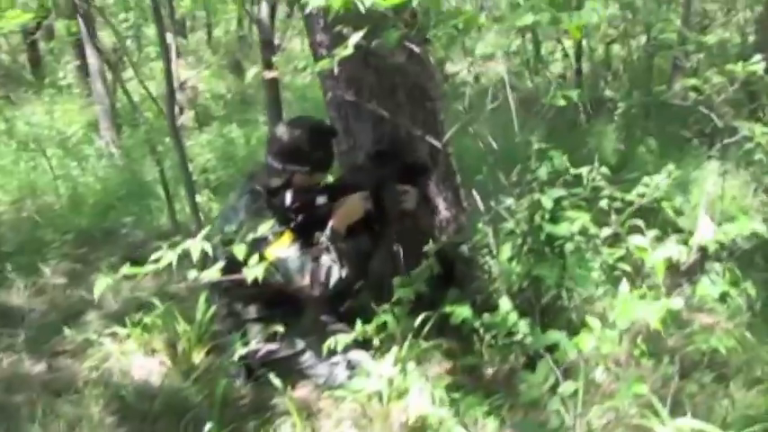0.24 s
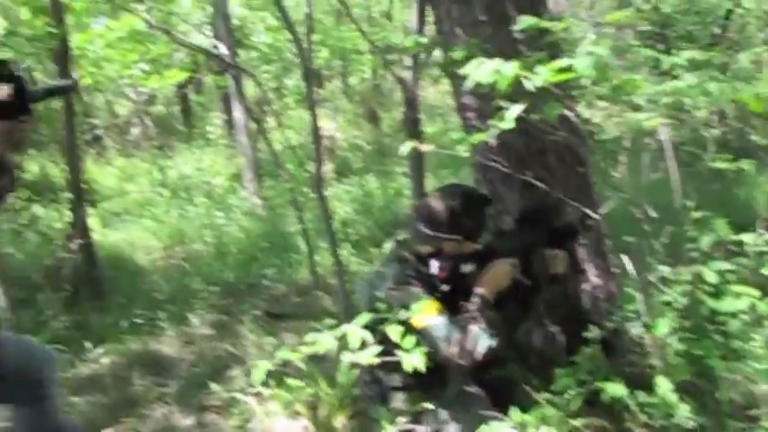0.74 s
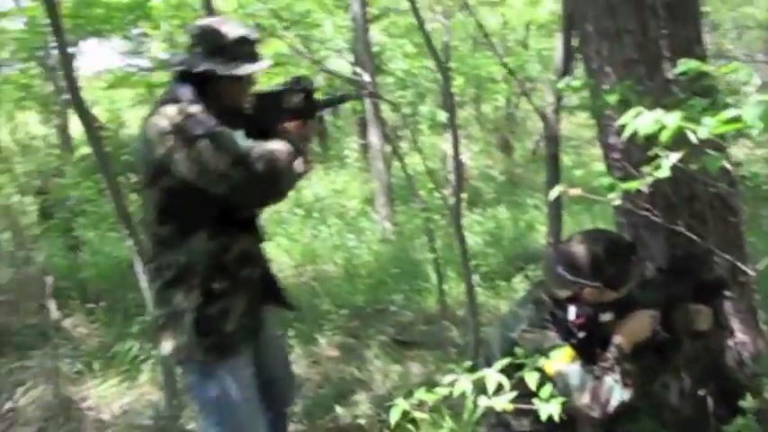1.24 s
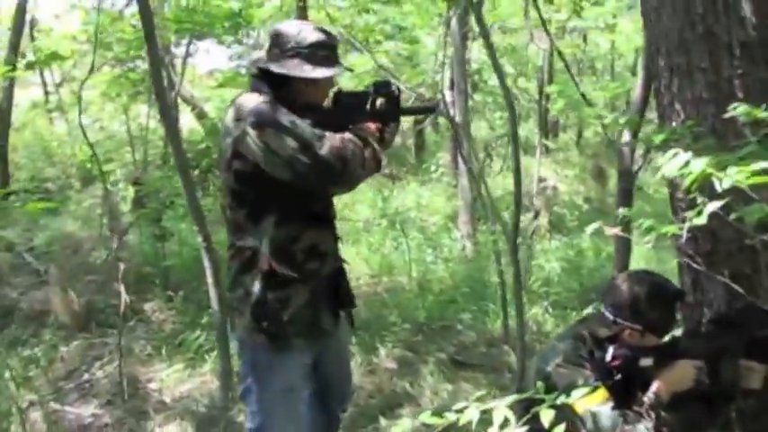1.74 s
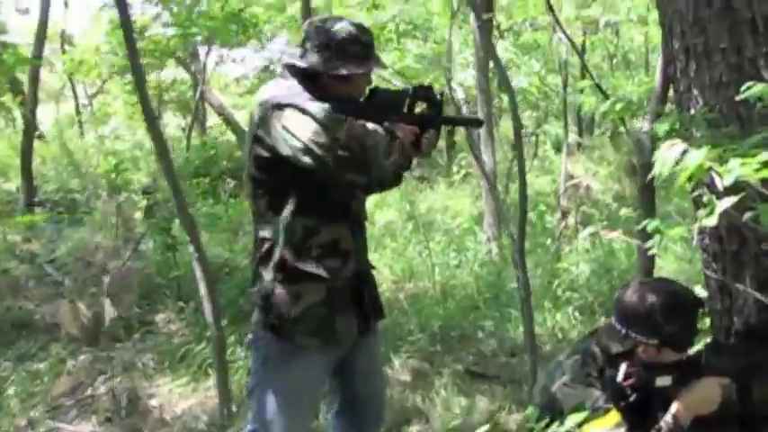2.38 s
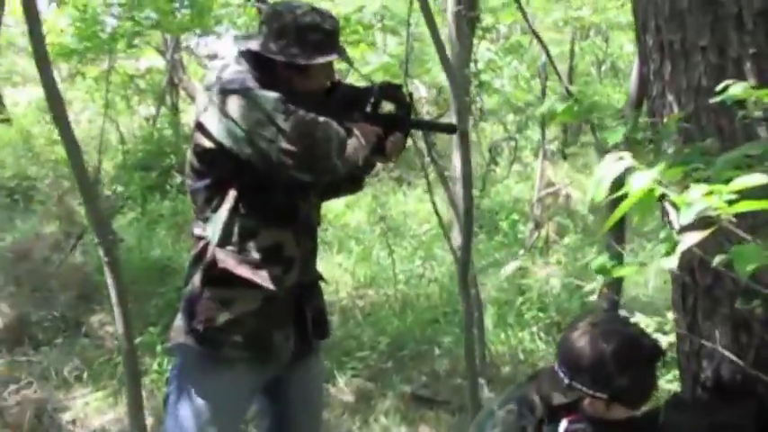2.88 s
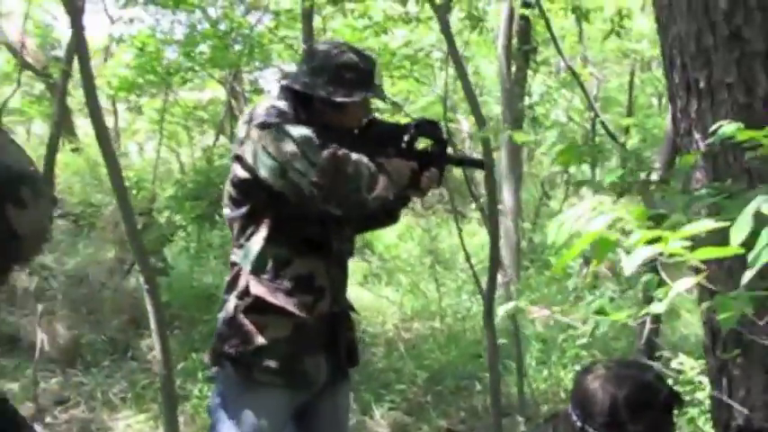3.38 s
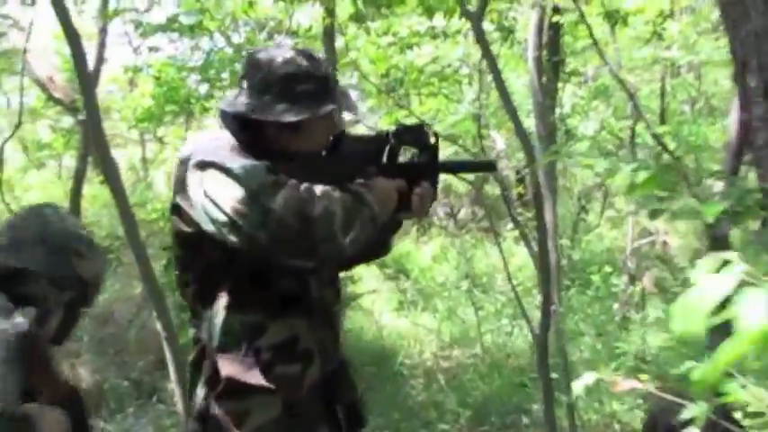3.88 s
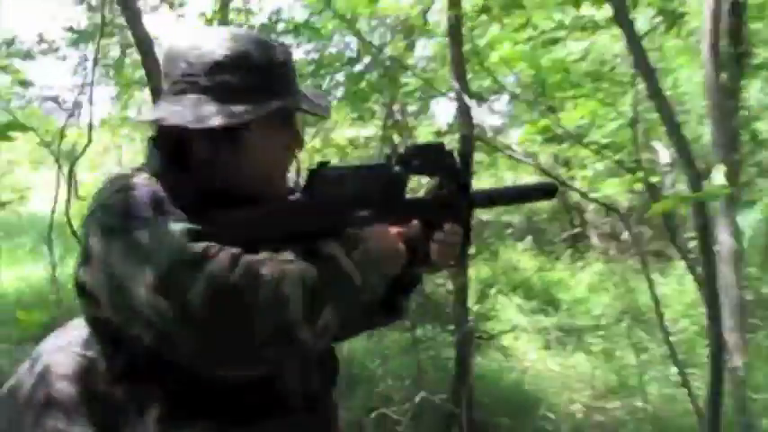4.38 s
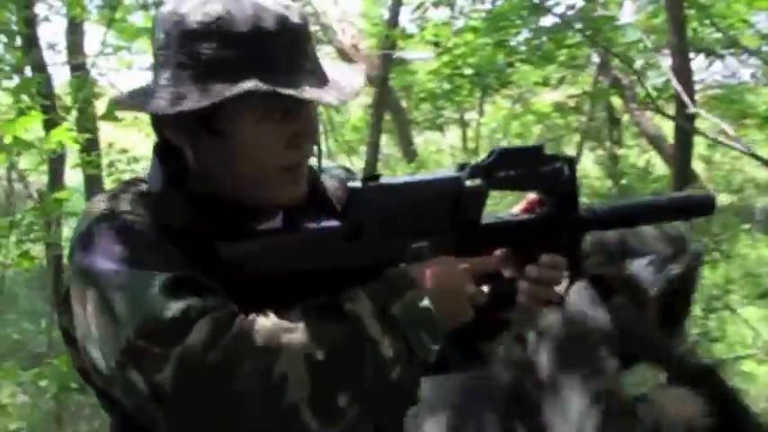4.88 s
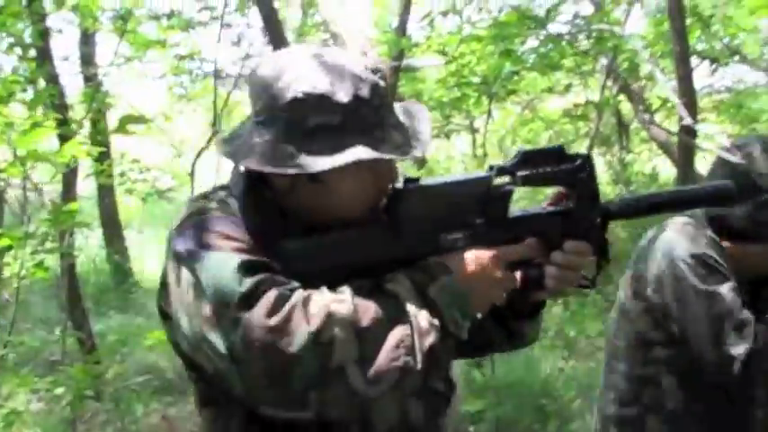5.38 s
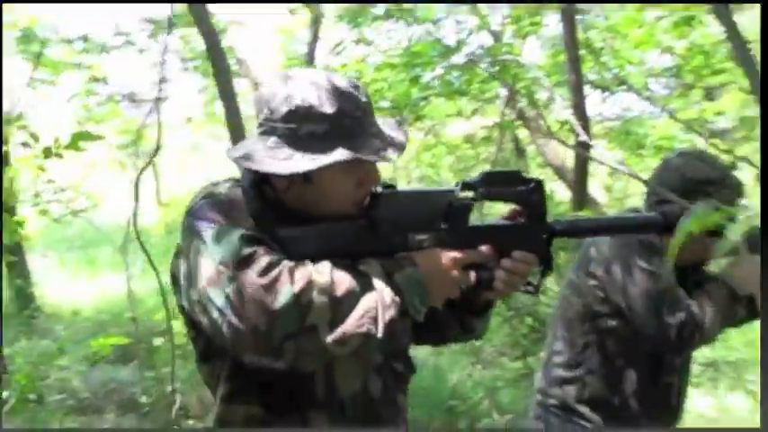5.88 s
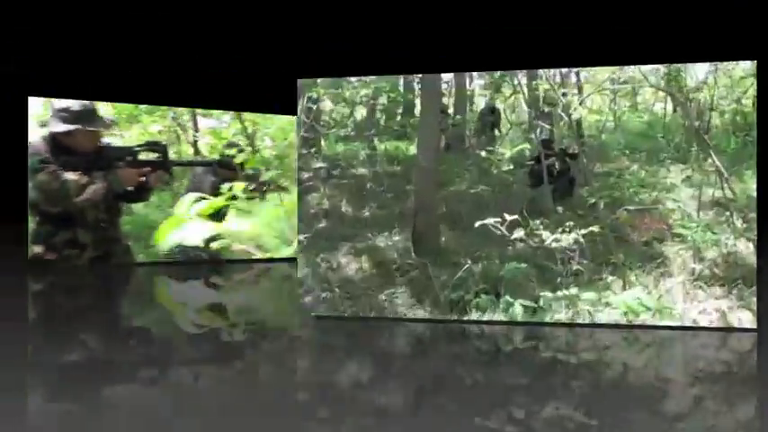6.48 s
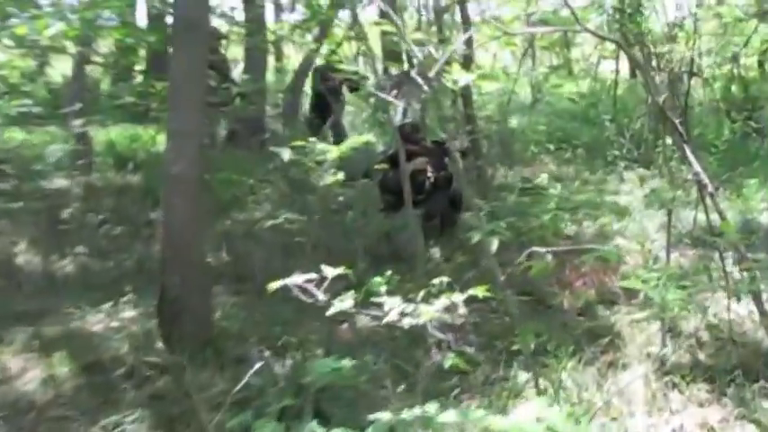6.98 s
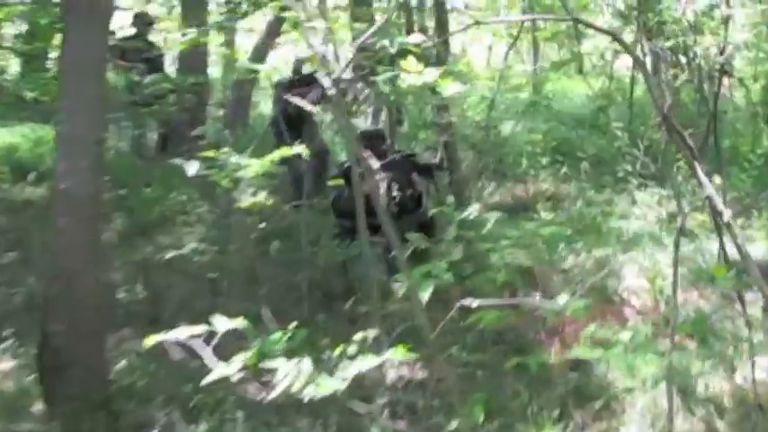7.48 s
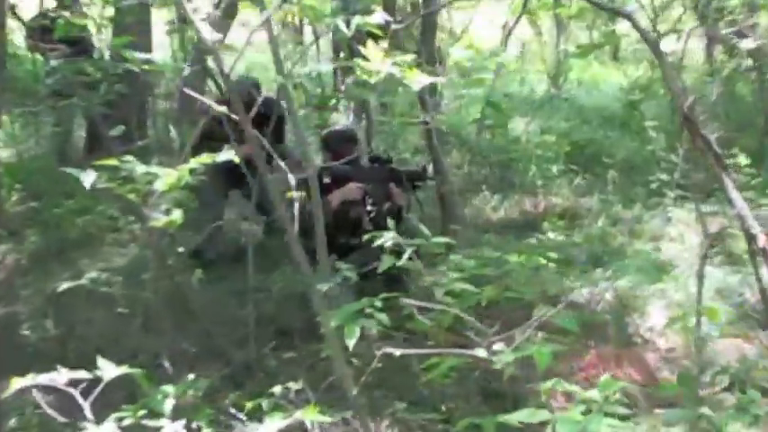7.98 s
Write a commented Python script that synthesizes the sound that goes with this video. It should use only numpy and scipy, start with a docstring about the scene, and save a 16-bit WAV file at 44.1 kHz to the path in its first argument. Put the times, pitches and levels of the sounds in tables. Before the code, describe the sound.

Outdoors in woodland, heard in stereo, electric airsoft guns fire over crisp leaf rustle and small ticks of twigs and pellets. Irregular single shots with short motor whines come first, then a steady run of clacking shots. A brief scrape and sharp snaps lead into a rapid automatic burst that trails off in fainter shots. A more distant, uneven burst follows, the cracks scattering briefly among the trees.

```python
"""Four electric airsoft guns fire in leafy woodland, heard at two microphones.
Leaves rustle and gears whirr; one gun fires single shots, and a second joins it at 2.3 s. After a scrape
and sharp snaps, a third fires a burst at 5.5 s that trails off in fainter shots; a fourth follows at 6.8 s.
In each full shot the gears wind, the piston rattles loose, air cracks at the muzzle and the piston slams.
Throughout, rough noise swells and fades, twigs and pellets tick, and trunks scatter the sharp sounds."""
import sys
import numpy as np
from scipy import signal
from scipy.fft import rfft, irfft
from scipy.io import wavfile
from scipy.ndimage import uniform_filter1d

SR = 44100
rng = np.random.default_rng(int(sys.argv[2]) if len(sys.argv) > 2 else 0)


def int16_out(signal):
    """Quantize to a 16-bit WAV file."""
    q = np.round(np.clip(np.atleast_2d(signal).T, -1, 1) * 32767)
    wavfile.write(sys.argv[1], SR, q.astype(np.int16))


N = 363384

# shots of the automatic burst: time_s, crack_peak_db, slam_db, winding_db
AUTOMATIC_SHOTS = [(5.4615, 1.5, -11, -32), (5.532, 2, -15, -43), (5.595, -2, -16, -36),
                   (5.657, -3, -18, -35), (5.719, -8, -17, -46), (5.778, -2.5, -18.5, -31),
                   (5.84, -1.5, -18, -35), (5.899, 1, -16.5, -33), (5.961, -6, -18, -31.5),
                   (6.021, 2.5, -17.5, -30), (6.081, -1.5, -18.5, -32.5), (6.141, 0, -20.5, -40),
                   (6.203, -6, -21, -38), (6.263, -1.5, -22, -32.5)]
# spectrum of meshing gears: frequency_hz, gain_db
GEAR_SPECTRUM = [(180, -18), (300, -48), (375, -12), (557, 1), (932, 0.5), (1080, 2.5), (2310, 1.5),
                 (3130, -0.5), (7000, -3), (9100, -5.5), (15400, -120)]
# direction of the surrounding activity: time_s, left_lag_samples
ARRIVAL_LAG = [(0, -1.5), (.7, -2.5), (1.1, 5.5), (3.2, 2), (3.7, 2), (4.8, 3.5), (5.2, 4), (6.2, 5.5),
               (6.8, 2.5), (8.24, -3.5)]
# likeness of diffuse sound at the two microphones: frequency_hz, coherence
COHERENCE = [(25, 0.52), (70, 0.78), (290, 1), (1400, 0.82), (4000, 0.095), (15000, 0.32)]


def gun(shots, crack_spectrum, slam_spectrum, modes, *, crack_ms, slam_ms, slam_t60, landing_db,
        rattle_db, rattle_ms, rattle_width_ms, latch_db, latch_ms, latch_hz, wind_ms, coast_t60,
        drone_hz, drone_db, drone_from_ms, drone_to_ms, rough, lag, pan_db, thump_db, thump_hz):
    """A spring-driven piston expels a pressure pulse, and its impact excites the modes of the body."""
    # Instants count from the crack; t60s are in s; rough is the drone's share of noise.
    # Landing, rattle, latch and thump levels are relative to the slam, the drone's to the winding.
    lead_s, out = .1, np.zeros((2, N))
    t = np.arange(16384) / SR - lead_s - .003
    ms = t * 1000
    after = np.maximum(t - slam_ms / 1000, 0)  # s since the piston met the cylinder head
    winding = np.clip((ms + wind_ms) / 8, 0, 1) * gain_of(-60 * np.maximum(t, 0) / coast_t60)
    droning = np.clip(np.minimum(ms - drone_from_ms, drone_to_ms - ms) / 7, 0, 1)
    # a low jolt as the piston leaps forward, 6 ms ahead of the crack
    thump = gain_of(thump_db) * np.sin(2 * np.pi * thump_hz * (ms + 6) / 1000) * gaussian(ms, -6, 6)
    loose = gain_of(rattle_db) * gaussian(ms, rattle_ms, rattle_width_ms)
    landing = gain_of(landing_db) * np.minimum(after / .00015, 1) * gaussian(after, 0, .00237)
    slamming = np.minimum(after / .00073, 1) * gain_of(-60 * after / slam_t60)
    ring = np.minimum(after / .0041, 1) * damped_modes(after, modes)
    for time_s, crack_db, slam_db, winding_db in shots:
        noise = rng.standard_normal((5, len(t)))
        air_hiss = .18 * noise[0] * (t > 0) * np.exp(-abs(ms) / crack_ms)
        crack = unit_peak(colour(impulse(t) + air_hiss, crack_spectrum))
        rattle = noise_puff(noise[1], loose + landing, crack_spectrum)
        slam = noise_puff(noise[2], slamming, slam_spectrum)
        latch = unit_rms(resonate(noise[3], latch_hz, 1600)) * gaussian(ms, latch_ms, .56)  # sear lets go
        fuzz = unit_rms(resonate(noise[4], drone_hz, width_hz=110))
        drone = unit_rms(rough * fuzz + (1 - rough) * np.sin(2 * np.pi * drone_hz * t))
        gears = winding * unit_rms(colour(noise[3], GEAR_SPECTRUM)) + droning * gain_of(drone_db) * drone
        body = slam + thump + ring + rattle + gain_of(latch_db) * latch
        shot = gain_of(crack_db) * crack + gain_of(slam_db) * body + gain_of(winding_db) * gears
        place(out, time_s - lead_s, shot, pan_db, lag)
    return out


def first_gun():
    """Scattered single shots: a hard piston impact drives two strong, low body modes."""
    shots = [(0.838, -10, -23.5, -24.5), (1.225, 0, -27, -35.5), (1.66, 0.5, -26, -37.5),
             (1.76, -0.5, -28, -27.5), (2.174, -7, -26, -27.5), (2.848, -5, -27, -24),
             (3.329, -19, -26, -31)]  # time_s, crack_peak_db, slam_db, winding_db
    crack = [(120, -48), (260, -10), (3310, -1.5), (3970, -1.5), (5630, -4.5), (9400, -8.5), (16000, -33)]  # muzzle spectrum: frequency_hz, gain_db
    slam = [(59, -36), (100, -30), (502, -14), (2800, -6), (5080, -49), (8640, -33), (14700, -16),
            (16000, -38)]  # impact spectrum: frequency_hz, gain_db
    modes = [(294, 10.5, 0.054), (664, 23.5, 0.0094)]  # body resonances: pitch_hz, level_db, t60_s
    build = dict(crack_ms=3, slam_ms=4.62, slam_t60=0.12, landing_db=18, rattle_db=14, rattle_ms=-0.71, rattle_width_ms=3.1, latch_db=6, latch_ms=-9.5, latch_hz=2660, wind_ms=80.4, coast_t60=0.042, drone_hz=1050, drone_db=-3.5, drone_from_ms=-31, drone_to_ms=-12, rough=0.9, lag=3.93, pan_db=-2.5, thump_db=-10, thump_hz=117)  # mechanism and direction: the keywords of gun()
    return gun(shots, crack, slam, modes, **build)


def second_gun():
    """Four shots a second: each impact is damped quickly while the gears coast on."""
    shots = [(2.328, -2.5, -18, -34), (2.599, -3, -16.5, -32), (2.837, 1, -15, -35),
             (3.089, 0, -17.5, -30.5), (3.303, 2, -19, -41), (3.558, -4.5, -19, -34.5),
             (3.789, -5, -16.5, -32), (4.014, 1.5, -16, -32.5)]  # time_s, crack_peak_db, slam_db, winding_db
    crack = [(120, -36), (200, -6.5), (1040, 3.5), (3560, -4), (8740, -11.5), (15100, -48), (16000, -29)]  # muzzle spectrum: frequency_hz, gain_db
    slam = [(59, -50), (100, -3), (818, -5), (1420, -37), (7450, 14), (8460, -24), (14400, -9), (16000, -5)]  # impact spectrum: frequency_hz, gain_db
    modes = [(570, 8.2, 0.038), (870, 2.4, 0.022), (1810, 9.6, 0.0092)]  # body resonances: pitch_hz, level_db, t60_s
    build = dict(crack_ms=3.8, slam_ms=0.61, slam_t60=0.014, landing_db=4.5, rattle_db=2.5, rattle_ms=-1.5, rattle_width_ms=2.35, latch_db=1, latch_ms=-13, latch_hz=3000, wind_ms=51.5, coast_t60=0.73, drone_hz=600, drone_db=-1.5, drone_from_ms=1.7, drone_to_ms=66, rough=1, lag=2.1, pan_db=-0.5, thump_db=-18, thump_hz=123)  # mechanism and direction: the keywords of gun()
    return gun(shots, crack, slam, modes, **build)


def third_gun():
    """Automatic fire: the cycling piston makes a nearly periodic train of 16 pulses a second."""
    crack = [(120, -40), (200, -17), (1910, 6.5), (5500, 9.5), (10500, -1), (14100, -6), (16000, -13)]  # muzzle spectrum: frequency_hz, gain_db
    slam = [(59, -48), (170, -42), (260, -8), (595, -1.5), (1500, 6.5), (3470, 3), (6150, -5), (8830, 1.5),
            (14700, -15), (16000, -28)]  # impact spectrum: frequency_hz, gain_db
    modes = [(270, -4.5, 0.032), (510, -3, 0.038), (788, -4.5, 0.037)]  # body resonances: pitch_hz, level_db, t60_s
    build = dict(crack_ms=1.8, slam_ms=2.08, slam_t60=0.043, landing_db=-18, rattle_db=1, rattle_ms=-1.9, rattle_width_ms=2.4, latch_db=-5, latch_ms=-7, latch_hz=3270, wind_ms=44, coast_t60=0.02, drone_hz=531, drone_db=-19, drone_from_ms=-36, drone_to_ms=-11, rough=0.29, lag=3.9, pan_db=-3, thump_db=-31.5, thump_hz=75)  # mechanism and direction: the keywords of gun()
    return gun(AUTOMATIC_SHOTS, crack, slam, modes, **build)


def fourth_gun():
    """Rapid fire farther off: an uneven pulse train of thin cracks over heavily damped modes."""
    shots = [(6.823, -9, -16.5, -44.5), (6.913, -3, -18.5, -36.5), (7.105, -12, -19, -41),
             (7.172, -11, -17.5, -39), (7.235, -1.5, -20.5, -39), (7.296, -5, -17.5, -42),
             (7.357, -1.5, -16.5, -43), (7.418, -5.5, -20, -37), (7.468, -9, -14, -35.5),
             (7.478, -4, -26, -44), (7.537, -1, -19, -34), (7.554, -2, -20, -49), (7.599, -5, -20, -51),
             (7.657, -6, -21.5, -59), (7.718, -4.5, -19.5, -59), (7.779, -7, -21, -57),
             (7.84, -4, -19, -37), (7.898, -1, -19.5, -47), (7.965, -13, -18.5, -39),
             (7.995, -1.5, -17, -38)]  # time_s, crack_peak_db, slam_db, winding_db
    crack = [(120, -62), (200, -50), (1870, -0.5), (2960, -3), (5230, 2.5), (13100, -10), (16000, -33)]  # muzzle spectrum: frequency_hz, gain_db
    slam = [(59, -48), (100, -25), (300, -13.5), (1010, -2), (2800, -4.5), (3470, -41), (7290, 1.5),
            (13500, -31), (16000, -22)]  # impact spectrum: frequency_hz, gain_db
    modes = [(480, -5.5, 0.02), (990, 3.5, 0.014), (2600, -14, 0.013)]  # body resonances: pitch_hz, level_db, t60_s
    build = dict(crack_ms=1, slam_ms=3.25, slam_t60=0.028, landing_db=-11, rattle_db=-3, rattle_ms=-1.5, rattle_width_ms=2.65, latch_db=-27, latch_ms=-7, latch_hz=6000, wind_ms=64, coast_t60=0.71, drone_hz=1570, drone_db=-16, drone_from_ms=-50, drone_to_ms=70, rough=0.61, lag=1.08, pan_db=0.2, thump_db=-31, thump_hz=114)  # mechanism and direction: the keywords of gun()
    return gun(shots, crack, slam, modes, **build)


def snaps():
    """A brief pulse is broadband: each sharp snap is followed by a damped knock and a noisy tail."""
    # scattered snaps; the last four, from 6.3 s, are fainter automatic shots trailing the burst
    events = [(0.1281, -13, -33, -7, 0.025, -1), (0.593, -7, -42, -30, .01, 4),
              (1.693, -14, -20, -8, .01, -1), (2.4641, -10, -4.5, -10.5, 0.049, 1),
              (2.7255, -17, -8, -7, 0.051, 1.5), (2.9709, -15, -5.5, -7, 0.046, 0),
              (3.2163, -20.5, -4, -5, 0.033, -1), (3.4373, -20.5, -2, -4, .035, -1),
              (3.7316, -23, 3, -6, .04, 1.5), (3.9253, -16, -5, -2, 0.038, 0),
              (4.1348, -17.5, -5, -4, 0.018, 0), (4.7228, -2, -21, -18, 0.018, 0),
              (4.7605, -5, -18.5, -18.5, 0.014, 1), (4.95, -14, -24, -17, 0.013, 10),
              (4.9558, -5.5, -19.5, -26, .01, -3), (4.9632, -2.5, -28, -23, 0.017, 3),
              (6.313, -11.5, -35, -15, .04, -6), (6.356, -13, -44, -15, 0.11, -8),
              (6.418, -13.5, -42, -18, 0.099, -8), (6.537, -16.5, -40, -34, .03, -4)]  # time_s, peak_db, relative_knock_db, relative_tail_db, tail_t60_s, pan_db
    snap_spectrum = [(120, -55), (300, -33), (1200, -13), (3000, 3.5), (6500, 0), (12000, -5), (16000, -16)]  # frequency_hz, gain_db
    tail_spectrum = [(120, -57), (300, -31), (700, -0.5), (2200, 4.5), (5000, -6.5), (12000, -11),
                     (16000, -21)]  # frequency_hz, gain_db
    modes = [(597, 0.5, 0.029), (2070, -50, 0.0047)]  # resonances of the knock: pitch_hz, level_db, t60_s
    lead_s, out = .002, np.zeros((2, N))
    t = np.arange(8192) / SR - lead_s
    after = np.maximum(t, 0)
    knock = damped_modes(after, modes)
    for time_s, peak_db, knock_db, tail_db, tail_t60, pan_db in events:
        noise = rng.standard_normal((2, len(t)))
        hiss = .15 * noise[0] * (t > 0) * np.exp(-after / .0012)
        snap = unit_peak(colour(impulse(t) + hiss, snap_spectrum))
        tail_envelope = np.clip(t / .0011 + 1, 0, 1) * gain_of(tail_db - 60 * after / tail_t60)
        sound = snap + gain_of(knock_db) * knock + noise_puff(noise[1], tail_envelope, tail_spectrum)
        place(out, time_s - lead_s, gain_of(peak_db) * sound, pan_db, lag=.9)
    return out


def ticks():
    """Triggers, twigs and pellets: a small impact excites one broad resonance; higher ones die sooner."""
    impacts = [(0.469, -16.5, 4230, 24), (0.543, -11.5, 4440, 15), (0.86, -14, 2980, -2),
               (0.97, -19, 777, -4), (0.979, -14.5, 2120, -16), (1.049, -29, 576, -.6),
               (1.072, -8.5, 5150, -10.5), (1.195, -22, 1370, -4), (1.2365, -12, 1510, 0),
               (1.259, -12, 2800, -8), (1.318, -6, 5170, -9), (1.399, -22.5, 746, -1),
               (1.532, -11, 5600, -7), (1.843, -26.5, 1160, -1.5), (1.882, -11, 5870, -3),
               (2.297, -31, 1670, -1.1), (2.409, -6.5, 5900, 4.5), (3.244, -18.5, 660, -1),
               (3.644, -21, 2420, -4), (3.676, -20, 694, 1), (3.837, -32, 630, -1), (3.872, -19, 2510, -6),
               (3.951, -16.5, 620, -1), (4.103, -20, 2800, -2), (4.409, -38, 1190, 0), (4.461, -34, 890, 0),
               (4.448, -30, 3500, -9), (4.655, -18.5, 8340, 17), (4.919, -29, 820, 4),
               (5.165, -15, 7200, -3), (5.254, -13.5, 7400, 0.6), (5.458, -24, 2500, -9),
               (5.509, -21, 1900, -4), (5.627, -17, 3100, -7), (5.756, -20, 2200, -9),
               (5.813, -8, 2440, -6), (6.06, -15, 2500, -8), (6.18, -16, 2500, -10), (6.256, -14, 8450, -2),
               (6.831, -19, 1810, -3), (6.85, -19, 2200, -2), (6.9213, -17, 2400, -4),
               (6.944, -22, 3300, -2.5), (6.956, -21, 1830, -9), (7.093, -14, 6600, 2),
               (7.225, -24, 4160, -7), (7.766, -13, 7100, -1), (8.207, -27, 3040, -18)]  # time_s, peak_db, pitch_hz, pan_db
    out, t = np.zeros((2, N)), np.arange(4096) / SR - .0015
    for time_s, peak_db, hz, pan_db in impacts:
        t60, width_hz = .041 * .9 ** np.log2(hz / 1000), .71 * hz
        splash = rng.standard_normal(len(t)) * (t > 0) * gain_of(-60 * abs(t) / t60)
        force = impulse(t) + 1.2 * (1000 / hz) ** .2 * splash
        ring = resonate(resonate(force, hz, width_hz), hz, width_hz)
        tick = unit_peak(ring + .027 * np.diff(force, prepend=0))
        place(out, time_s, gain_of(peak_db) * tick, pan_db, at_time(ARRIVAL_LAG, time_s))
    return out


def gear_whines():
    """The tooth-meshing frequency follows motor speed: a rough tone, its octave and a rasp glide."""
    glides = [(0.459, 0.12, 1906, 1880, -33.5, -4), (0.756, 0.1, 689, 1898, -23.5, -4),
              (0.891, 0.032, 2000, 950, -34.5, -7), (0.939, 0.035, 1300, 1400, -43, -10),
              (2.085, 0.086, 835, 1880, -31, -3), (2.28, 0.036, 1630, 1850, -33, -15),
              (2.551, 0.048, 1455, 1900, -32, -18), (2.775, 0.068, 812, 1700, -28.5, -17),
              (3.264, 0.047, 1170, 1600, -28, -10), (3.747, 0.035, 1577, 1780, -30.5, -14),
              (3.98, 0.032, 1590, 1820, -29, -8), (5.419, 0.04, 1703, 1750, -29, -1.5),
              (6.626, 0.093, 1030, 1035, -53, -15), (6.754, 0.065, 1543, 1590, -46.5, -7),
              (6.844, 0.061, 1590, 1630, -45, -1), (7.422, 0.043, 1285, 1570, -34.5, -15),
              (7.481, 0.072, 1450, 1560, -38, -10), (7.548, 0.027, 1150, 1000, -37, -8),
              (7.913, 0.033, 1590, 1500, -41, -10), (7.946, 0.045, 1390, 1610, -33, -6),
              (8.009, 0.061, 1500, 1420, -42, -4)]  # start_s, length_s, first_hz, last_hz, level_db, relative_octave_db
    out = np.zeros((2, N))
    fuzz_hz, rasp_db, swell_db = 90, -5.5, 2
    for start_s, length_s, first_hz, last_hz, level_db, octave_db in glides:
        progress = np.arange(0, length_s, 1 / SR) / length_s
        hz = first_hz + (last_hz - first_hz) * np.sqrt(progress)  # moves fastest at first
        noise = rng.standard_normal((3, len(hz)))
        tooth = 1.1 * np.sin(2 * np.pi * np.cumsum(hz) / SR) + unit_rms(resonate(noise[0], hz, fuzz_hz))
        octave = unit_rms(resonate(noise[1], 2 * hz, 2 * fuzz_hz))
        rasp = unit_rms(resonate(noise[2], hz, width_hz=910))
        tone = unit_rms(tooth) + gain_of(octave_db) * octave + gain_of(rasp_db) * rasp
        envelope = gain_of(level_db + swell_db * progress) * signal.windows.tukey(len(hz), .3)
        place(out, start_s, tone * envelope, pan_db=-1.5, lag=3)
    return out


def motor_hum():
    """Load modulation: freed by each automatic shot, the motor races, then sags as it loads the spring."""
    start_s, end_s, first_hz, last_hz = 5.5, 6.27, 518, 530
    level_db, sag_hz, sag_db = -37.5, 35, -3
    out, t = np.zeros((2, N)), np.arange(start_s, end_s, 1 / SR)
    shot_times = np.transpose(AUTOMATIC_SHOTS)[0]
    cycles = np.interp(t, shot_times, np.arange(len(shot_times)))
    load = uniform_filter1d(cycles % 1, size=300)
    hz = np.linspace(first_hz, last_hz, len(t)) + sag_hz * (.5 - load)
    fuzz = unit_rms(resonate(rng.standard_normal(len(t)), hz, width_hz=45))
    tone = unit_rms((np.sin(2 * np.pi * np.cumsum(hz) / SR) + .4 * fuzz) * gain_of(sag_db * load))
    place(out, start_s, gain_of(level_db) * tone * signal.windows.tukey(len(t), .1), pan_db=-1.5, lag=3.9)
    return out


def trunk_echoes(sound):
    """Scattering from trunks: sparse echoes of random sign, each band decaying at its own rate."""
    decay_times = [(200, 0.096), (1000, 0.14), (4000, 0.22), (14000, 0.31)]  # woodland reverberation: frequency_hz, t60_s
    taps, slot = np.zeros((2, SR // 4)), 20  # one echo in every slot of samples
    slots = np.arange(200, SR // 4 - slot, slot)
    arrivals = slots + rng.integers(0, slot, (2, len(slots)))
    np.put_along_axis(taps, arrivals, rng.choice([-1., 1.], arrivals.shape), 1)
    hz, t, (left, other) = signal.stft(taps, SR, nperseg=256)
    decay = gain_of(-60 * t / at_frequency(decay_times, hz)[:, None])
    tail = signal.istft(np.array([left, partly_coherent(left, other, hz)]) * decay, SR, nperseg=256)[1]
    return signal.oaconvolve(sound, tail / np.linalg.norm(tail[0]), axes=1)[:, :N]


def scrapes():
    """Friction of a branch or sleeve: noise rings in one drifting resonance."""
    strokes = [
        [(0.25, 4300, -29), (0.384, 4220, -38), (0.429, 4020, -25.5), (0.55, 4030, -25), (0.572, 4080, -42),
         (0.582, 4160, -28), (0.62, 4100, -42)],
        [(4.722, 5600, -30), (4.743, 6000, -20), (4.751, 6000, -36), (4.765, 5600, -25), (4.795, 5500, -39)],
    ]  # one list per scrape: time_s, centre_hz, level_db
    widths_hz, lags = (620, 1400), (-1.2, 1)
    out = np.zeros((2, N))
    for stroke, width_hz, lag in zip(strokes, widths_hz, lags):
        times, centre_hz, level_db = np.transpose(stroke)
        t = np.arange(times[0], times[-1], 1 / SR)
        hiss = unit_rms(resonate(rng.standard_normal(len(t)), np.interp(t, times, centre_hz), width_hz))
        envelope = gain_of(np.interp(t, times, level_db)) * signal.windows.tukey(len(t), .2)
        place(out, times[0], hiss * envelope, pan_db=.6, lag=lag)
    return out


def leaf_rustle(t):
    """Many tiny leaf contacts add up to granular noise; returns the sound and its level in dB."""
    stirring = [(0.0, -33, 0), (0.27, -28.5, -0.5), (0.55, -25.5, 2), (0.88, -45, -9.5), (.94, -41, -4),
                (1, -30.5, -2.5), (1.801, -34, -3.5), (1.85, -39, -2.5), (2.06, -32, -4), (2.29, -31, 2.5),
                (2.66, -31, -0.5), (2.705, -33, 2), (2.76, -29.5, 0), (3.01, -28.5, 1.5), (3.15, -35, 1.5),
                (3.68, -42.5, 4.5), (3.85, -28, 1.5), (4.1, -42, 4), (4.36, -40, -3), (5.4, -32.5, -1.4),
                (5.65, -33, -9), (5.94, -28.5, -8), (6.17, -34, -11.5), (6.52, -42.5, -6.5),
                (6.75, -49.5, -4), (6.9, -46, -10), (7.02, -38.5, -3), (7.34, -37, -9), (7.87, -34, -5),
                (8.24, -39.5, -2)]  # leaves all around: time_s, level_db, tilt_db_per_octave
    swishes = [(0.777, 0.11, -20.5), (4.222, 0.06, -38), (4.54, 0.035, -37.5), (4.716, 0.074, -31.5),
               (4.956, 0.024, -56), (5.199, 0.066, -29)]  # players brushing past: centre_s, half_width_s, level_db
    spectrum = [(880, -77), (1500, -12.5), (1950, -12.5), (2170, -13.5), (2970, -7), (4050, -1),
                (12600, -4.5), (15900, -19.5), (16500, -55)]  # frequency_hz, gain_db
    times, stir_db, tilt_db = np.transpose(stirring)
    level_db = 20 * np.log10(gain_of(np.interp(t, times, stir_db)) + swells(t, swishes))
    crackle = granular_noise(grains_per_s=610, spread_db=6, graininess=.69)
    return diffuse(crackle, spectrum, (2200, 21000), level_db, np.interp(t, times, tilt_db)), level_db


def gearbox_whirr(t):
    """Rattling gear teeth merge into broadband noise; returns the sound and its level in dB."""
    activity = [(0.0, -39.5), (0.25, -34), (0.44, -30.5), (0.69, -30.5), (.9, -32), (.94, -37), (1.0, -27),
                (1.14, -48.5), (1.28, -29.5), (1.38, -41), (1.8, -38.5), (2.05, -39.5), (2.27, -30.5),
                (2.66, -28.5), (2.705, -37.5), (2.75, -29.5), (3.01, -29.5), (3.16, -28), (3.2, -41.5),
                (3.3, -24), (3.42, -39.5), (3.58, -29.5), (3.7, -42), (3.85, -25.5), (3.9, -38),
                (3.97, -30.5), (4.11, -31.5), (4.19, -42.5), (4.35, -42.5), (5.09, -38.5), (5.18, -34.5),
                (5.36, -36), (5.48, -27.5), (5.62, -35), (6.06, -41), (6.2, -32), (6.42, -42.5), (6.5, -48),
                (6.75, -45.5), (6.9, -37), (7.02, -48), (7.39, -41), (7.89, -44), (8.06, -38), (8.14, -47),
                (8.24, -41)]  # gearbox loudness: time_s, level_db
    level_db = at_time(activity, t)
    rattle = granular_noise(grains_per_s=240, spread_db=1, graininess=.74)
    return diffuse(rattle, GEAR_SPECTRUM, (900, 14000), level_db), level_db


def low_mid_noise(t, whirr_db):
    """Amplitude modulation: rough noise near 580 Hz swells and fades; its floor follows the gear whirr."""
    peaks = [(0.268, -50), (.45, -60), (.64, -39.5), (1.1, -47), (1.5, -54), (1.95, -44), (2.1, -41),
             (2.55, -44), (2.73, -40.5), (3.08, -41), (3.9, -65), (4.72, -61), (5.16, -46.5), (5.98, -62),
             (7.25, -58), (7.75, -52)]  # crests of the swells: time_s, level_db
    spectrum = [(300, -7), (450, -2), (580, -1), (750, -8), (1100, -1.5)]  # frequency_hz, gain_db
    rise_s, t60_s = .07, .56
    envelope = gain_of(whirr_db - 18)
    for time_s, level_db in peaks:
        rise = np.clip((t - time_s) / rise_s + 1, 0, 1)
        envelope += rise * gain_of(level_db - 60 * np.maximum(t - time_s, 0) / t60_s)
    noise = granular_noise(grains_per_s=120, spread_db=3.5, graininess=.94)
    return diffuse(noise, spectrum, (450, 700), level_db=0) * envelope


def rumble(rustle_db, whirr_db):
    """Low noise follows the power sum of leaves and gears, 22 dB below it."""
    spectrum = [(15, -40), (25, -10), (75, -27), (195, -17.5), (335, -8.5), (458, -25), (500, -19),
                (650, -28), (1100, -120)]  # frequency_hz, gain_db
    sum_db = 10 * np.log10(gain_of(rustle_db) ** 2 + gain_of(whirr_db) ** 2)
    noise = granular_noise(grains_per_s=100, spread_db=-3, graininess=.39)
    return diffuse(noise, spectrum, (40, 350), sum_db - 22)


def wind(t):
    """Turbulence buffets each microphone independently: deep noise in a faint breeze and a few gusts."""
    gusts = [(0.0, 0.2, -46), (2.36, .1, -49), (2.55, 0.11, -49), (2.698, 0.061, -38)]  # centre_s, half_width_s, level_db
    breeze_db = -68
    buffeting = signal.sosfilt(signal.butter(2, 60, fs=SR, output="sos"), rng.standard_normal((2, N)))
    return unit_rms(buffeting) * (gain_of(breeze_db) + swells(t, gusts))


def gain_of(db):
    return 10 ** (np.asarray(db) / 20)


def unit_rms(x):
    return x / np.sqrt(np.mean(x ** 2) + 1e-20)


def unit_peak(x):
    return x / abs(x).max()


def impulse(t):
    return abs(t) < .5 / SR


def gaussian(t, centre, half_width):
    return np.exp(-((t - centre) / half_width) ** 2)


def swells(t, rows):
    return sum(gain_of(db) * gaussian(t, centre_s, half_width_s) for centre_s, half_width_s, db in rows)


def at_time(curve, t):
    return np.interp(t, *np.transpose(curve))


def at_frequency(curve, hz):
    frequencies, values = np.transpose(curve)
    return np.interp(np.log(hz + 1), np.log(frequencies + 1), values)


def damped_modes(t, modes):
    """Free vibration is a sum of exponentially decaying sinusoids."""
    return sum(np.sin(2 * np.pi * hz * t) * gain_of(db - 60 * t / t60) for hz, db, t60 in modes)


def colour(x, spectrum):
    """Minimum-phase filter: the phase follows from the log gain by the Hilbert transform."""
    gain_db = np.maximum(at_frequency(spectrum, abs(np.fft.fftfreq(2048, 1 / SR))), -80)
    response = np.exp(np.conj(signal.hilbert(np.log(gain_of(gain_db)))))
    return signal.fftconvolve(x, np.fft.ifft(response).real[:1024])[:len(x)]


def noise_puff(noise, envelope, spectrum):
    """Source and filter: enveloped noise passes through a filter of unit power gain."""
    return colour(noise * envelope, spectrum) / np.std(colour(noise, spectrum))


def resonate(x, hz, width_hz):
    """Heterodyne resonator: shifts hz, which may glide, down to zero, smooths, and shifts back."""
    carrier = np.exp(2j * np.pi * np.cumsum(hz * np.ones(len(x))) / SR)
    pole = np.exp(-np.pi * width_hz / SR)
    return 2 * (carrier * signal.lfilter([1 - pole], [1, -pole], x / carrier)).real


def granular_noise(grains_per_s, spread_db, graininess):
    """A Poisson stream of uneven millisecond grains modulates each of two independent noises."""
    sizes = gain_of(spread_db * np.minimum(rng.exponential(1, (2, N)), 3.5))
    onsets = rng.random((2, N)) < grains_per_s / SR
    grains = signal.lfilter([1], [1, -.985], sizes * onsets, axis=1)
    return unit_rms((unit_rms(grains) * graininess + 1) * rng.standard_normal((2, N)))


def place(mix, start_s, sound, pan_db, lag):
    """Direction from level and time differences: the left is pan_db louder and lag samples later."""
    delay = np.exp(-2j * np.pi * np.fft.rfftfreq(len(sound)) * lag)
    left = irfft(rfft(sound) * delay, len(sound))
    pair = np.array([left, sound]) * gain_of([[pan_db / 2], [-pan_db / 2]])
    span = mix[:, round(start_s * SR):][:, :len(sound)]
    span += pair[:, :span.shape[1]]


def partly_coherent(common, independent, hz):
    """An equal-power blend of two spectrograms sets the coherence between the microphones."""
    coherence = at_frequency(COHERENCE, hz)[:, None]
    return coherence * common + np.sqrt(1 - coherence ** 2) * independent


def diffuse(noises, spectrum, band_hz, level_db, tilt_db=np.zeros(N)):
    """A partly coherent field: level_db is the gain within band_hz, before a tilt about 6 kHz."""
    hz, t, (right, other) = signal.stft(noises, SR, nperseg=512, noverlap=384)
    outside = (hz < spectrum[0][0]) | (hz > spectrum[-1][0])
    shape = gain_of(at_frequency(spectrum, hz) - 60 * outside)
    shape /= np.sqrt(np.mean(shape ** 2 * (hz >= band_hz[0]) * (hz <= band_hz[1])))
    delay = np.exp(-2j * np.pi * hz[:, None] / SR * at_time(ARRIVAL_LAG, t))
    left = partly_coherent(right, other, hz) * delay
    tilt = gain_of(np.log2((hz[:, None] + 1) / 6000) * np.interp(t * SR, np.arange(N), tilt_db))
    pair = np.array([left, right]) * shape[:, None] * tilt
    return signal.istft(pair, SR, nperseg=512, noverlap=384)[1][:, :N] * gain_of(level_db)


def scene():
    """Superposition of all sources; only the shots, snaps and ticks echo from the trunks."""
    t = np.arange(N) / SR
    hits = ticks() + snaps() + first_gun() + second_gun() + third_gun() + fourth_gun()
    echoes = gain_of(-6) * trunk_echoes(hits)
    motors = gear_whines() + motor_hum()
    leaves, rustle_db = leaf_rustle(t)
    gears, whirr_db = gearbox_whirr(t)
    background = leaves + gears + low_mid_noise(t, whirr_db) + rumble(rustle_db, whirr_db)
    return hits + echoes + motors + background + scrapes() + wind(t)


def record(dry):
    """Small microphone ports drop the deep bass; the level dips early on, peaks clip, the top is cut."""
    dip_s, dip_db, fade_out_s, fade_in_s = .1966, -19, .081, .026
    clip_level, top_hz = .88, 16100
    since = np.arange(N) / SR - dip_s
    dip = np.clip(np.maximum(-since / fade_out_s, since / fade_in_s), gain_of(dip_db), 1)
    thinned = signal.sosfilt(signal.butter(2, 55, "high", fs=SR, output="sos"), dry)
    lowpass = signal.firwin(511, top_hz, window=("kaiser", 9), fs=SR)[None]
    return signal.oaconvolve(np.clip(thinned * dip, -clip_level, clip_level), lowpass, "same")


dry = scene()
out = record(dry)
int16_out(out)
```